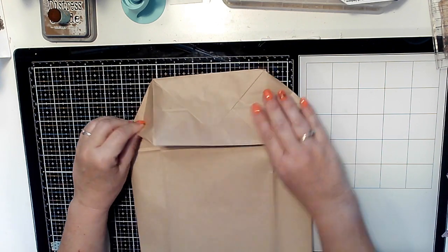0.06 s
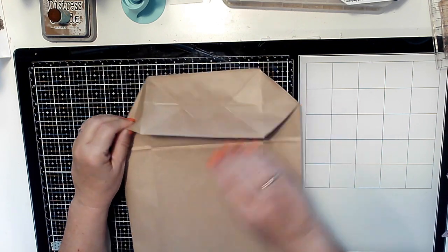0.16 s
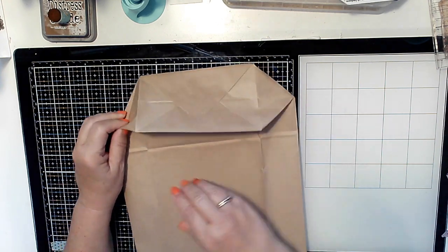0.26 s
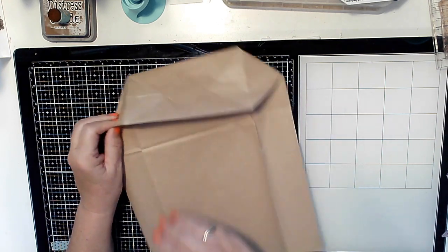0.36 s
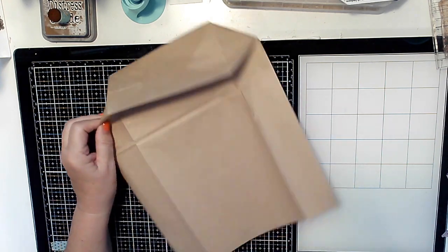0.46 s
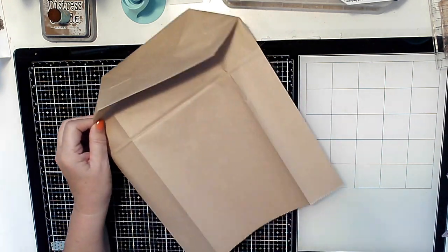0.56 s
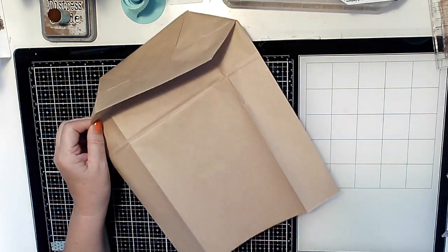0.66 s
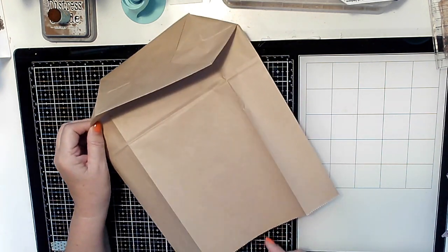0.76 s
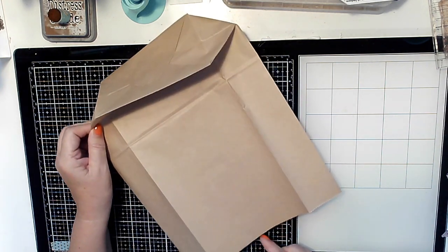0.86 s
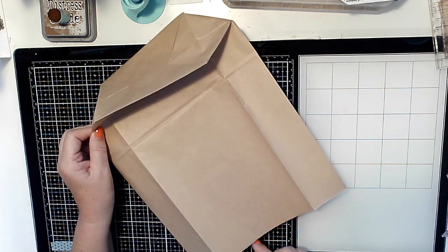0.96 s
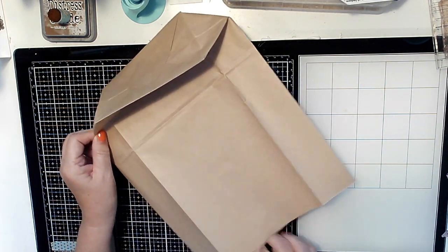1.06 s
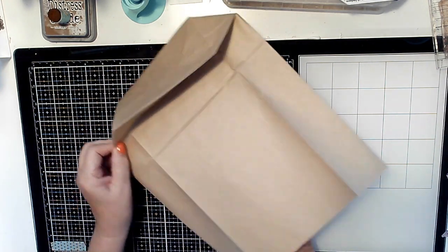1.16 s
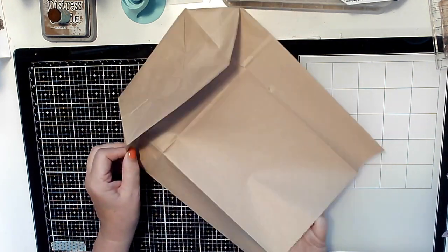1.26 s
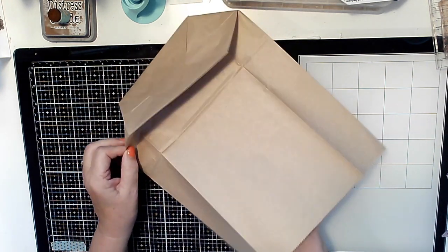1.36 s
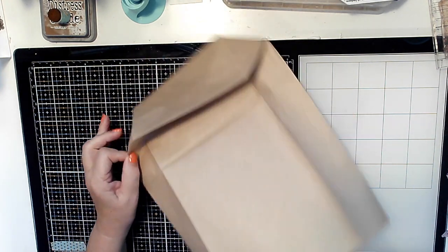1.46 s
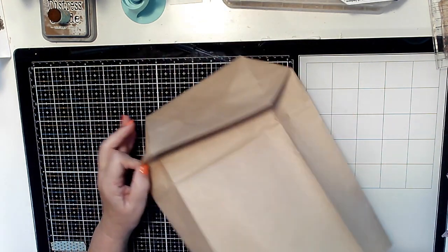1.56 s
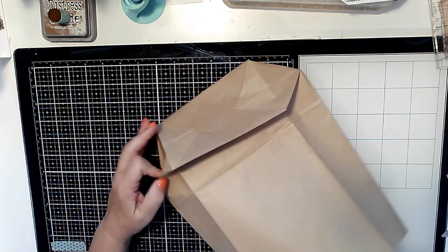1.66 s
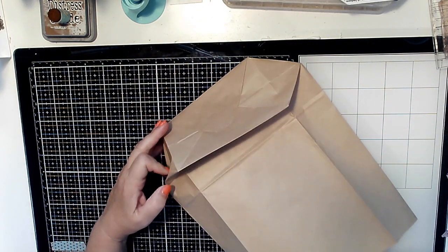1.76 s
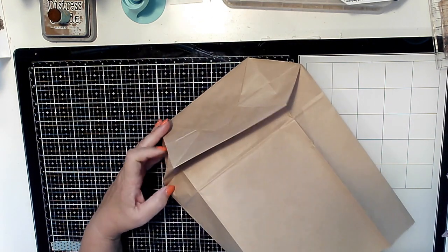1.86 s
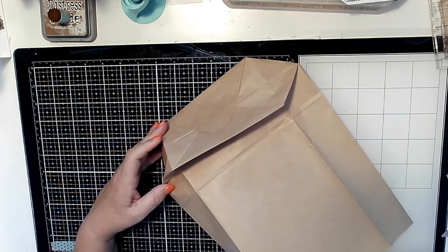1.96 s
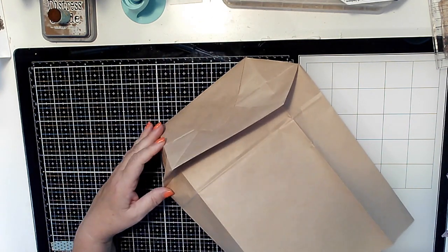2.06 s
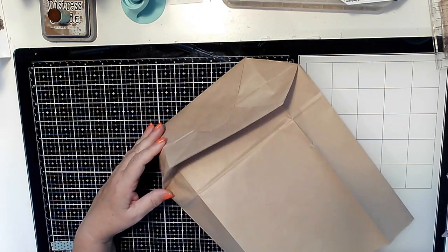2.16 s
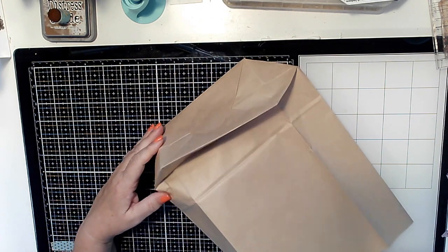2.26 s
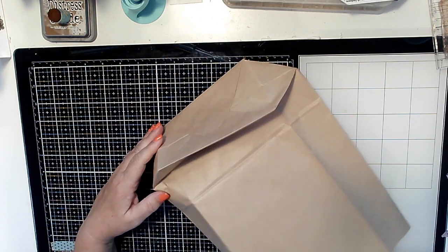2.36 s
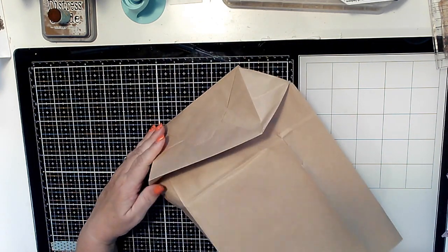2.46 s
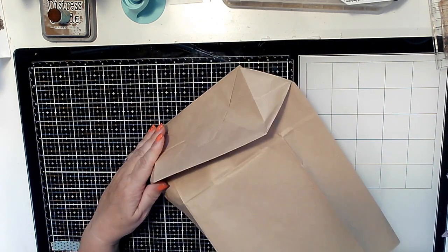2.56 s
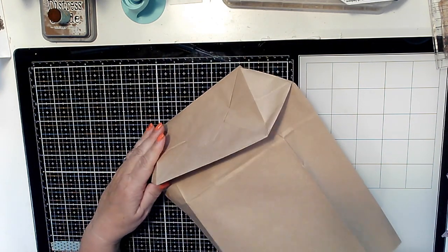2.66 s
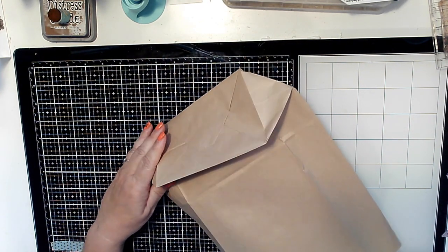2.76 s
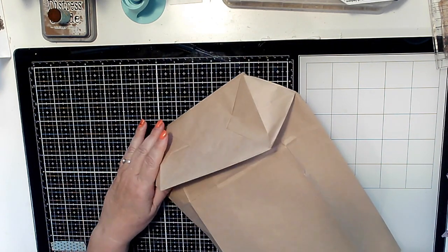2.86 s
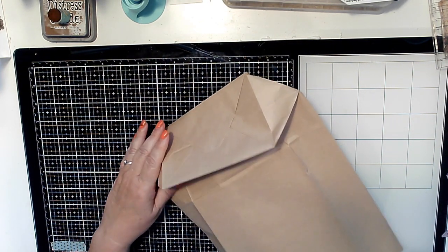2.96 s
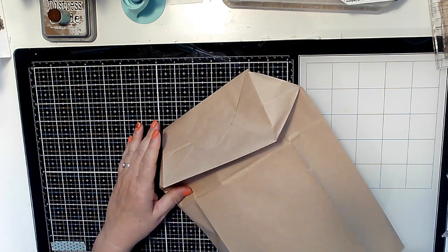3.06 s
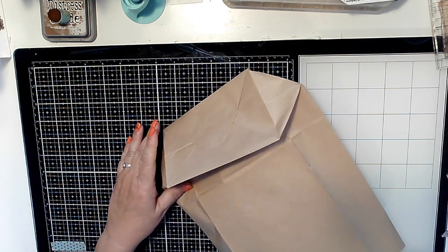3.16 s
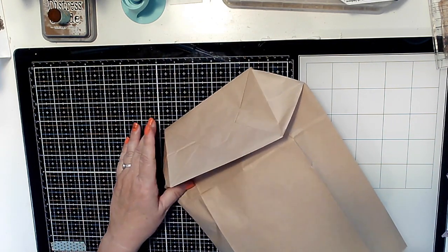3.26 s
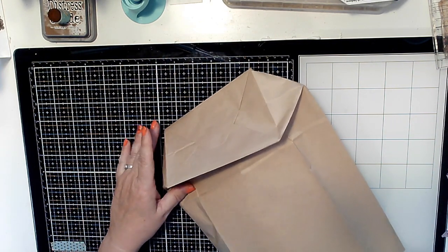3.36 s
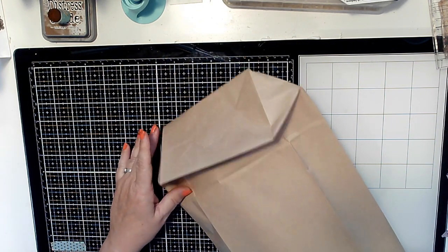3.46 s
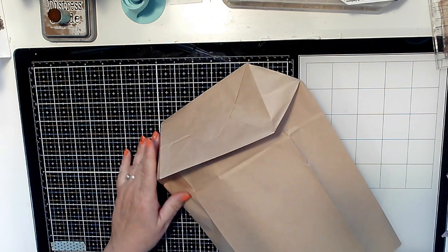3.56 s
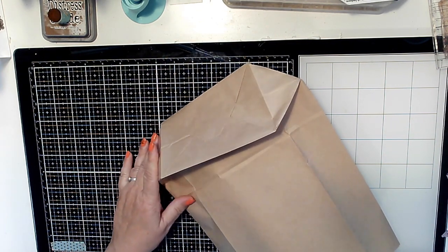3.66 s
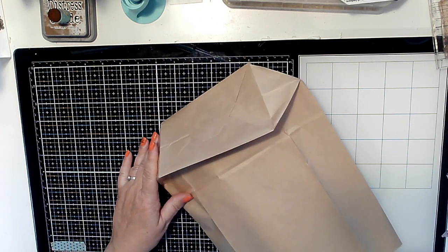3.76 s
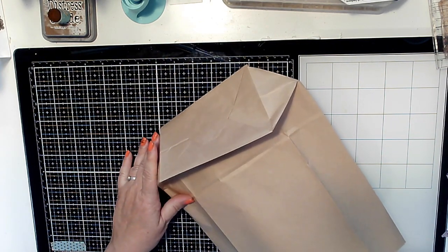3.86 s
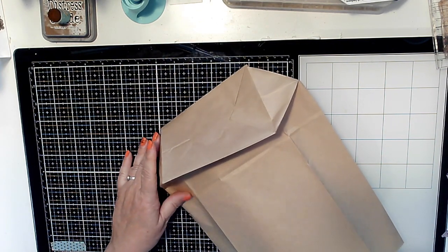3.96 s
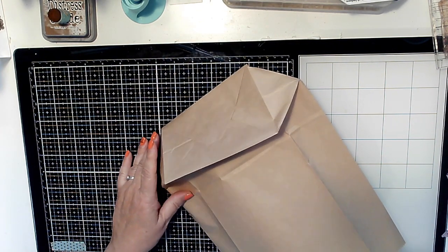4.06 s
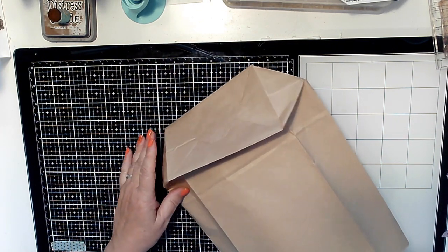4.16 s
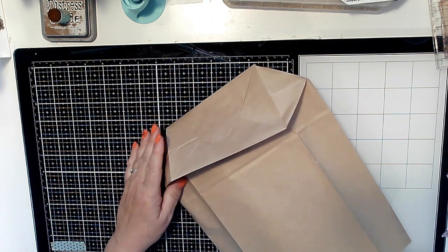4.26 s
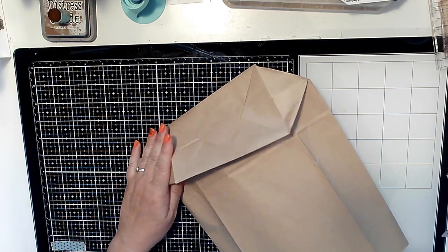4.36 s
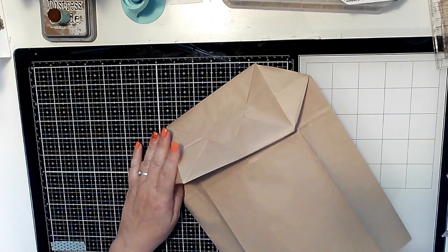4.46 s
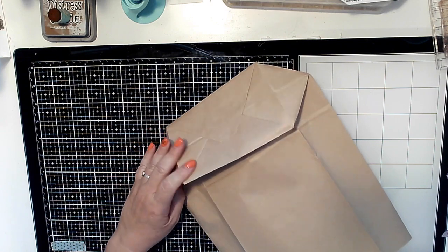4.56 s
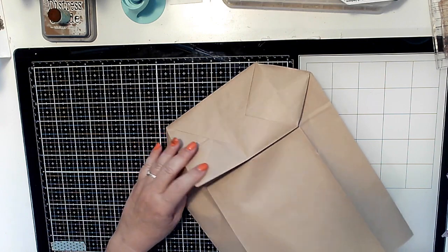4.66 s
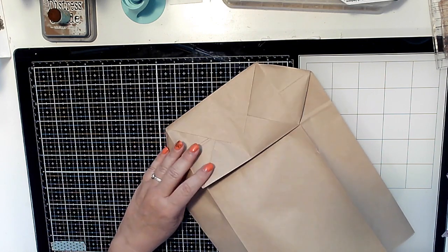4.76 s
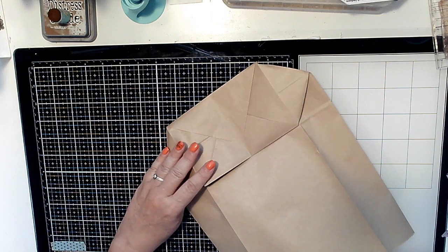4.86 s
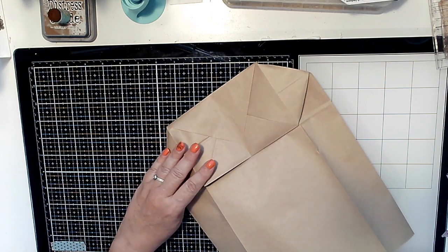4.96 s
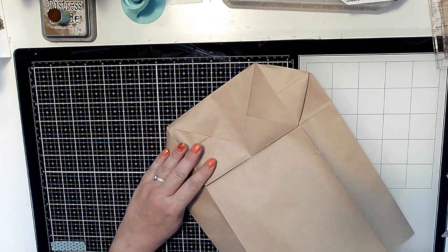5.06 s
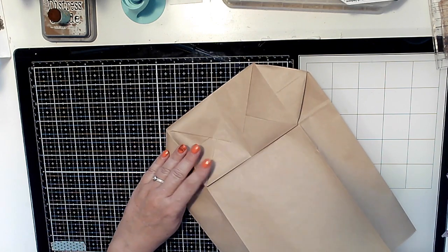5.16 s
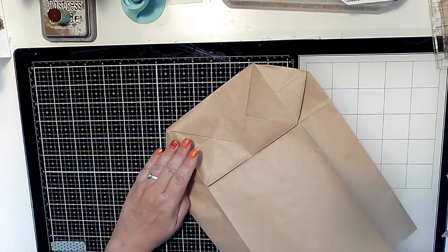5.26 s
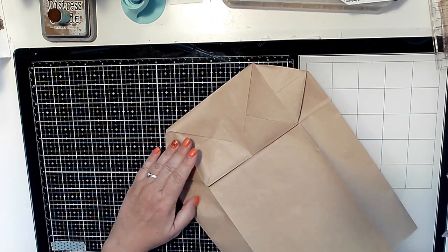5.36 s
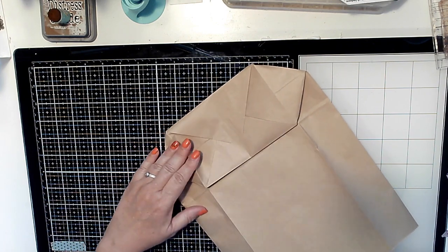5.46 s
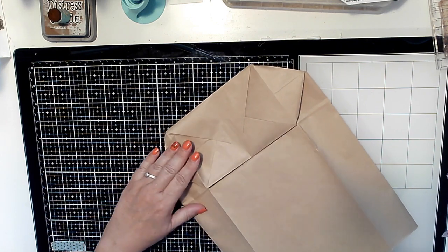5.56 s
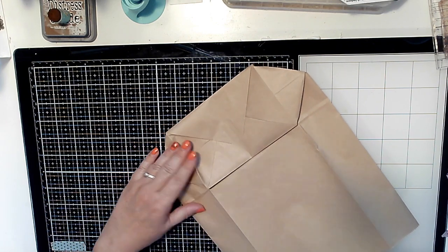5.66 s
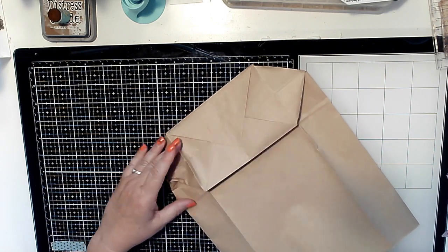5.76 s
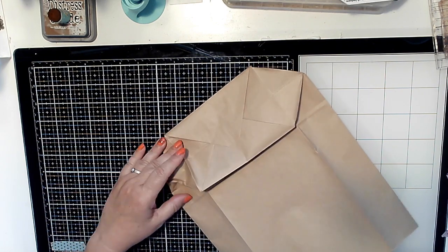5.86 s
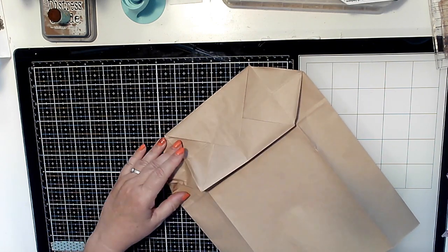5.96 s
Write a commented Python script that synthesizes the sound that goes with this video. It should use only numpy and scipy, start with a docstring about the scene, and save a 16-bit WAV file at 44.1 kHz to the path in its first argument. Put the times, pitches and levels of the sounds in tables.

```python
"""Creases of stiff paper crinkle in short bursts while wide panels pop and flap and the sheet slides on a mat.
Two hands turn a paper bag on a cutting mat and press its bottom flap along the creases. Crinkles and slides are
filtered trains of tiny stick-slip impulses; panels are pushes filtered around a pitch. Modes of the room and
table add resonances, a small, fairly dry room answers, and a microphone chain shapes the result."""
import sys
import numpy as np
from scipy import signal
from scipy.fft import rfft, irfft, next_fast_len
from scipy.io import wavfile
from scipy.ndimage import uniform_filter1d, map_coordinates

SR = 44100
rng = np.random.default_rng(int(sys.argv[2]) if len(sys.argv) > 2 else 0)


def bounce(signal):
    """Save signal as a 16-bit WAV file at the path given by the first command-line argument."""
    frames = np.transpose(np.atleast_2d(signal))
    limited = np.clip(frames, -1, 1)
    pcm = np.round(limited * 32767).astype(np.int16)
    wavfile.write(sys.argv[1], SR, pcm)


N = 265041
LEAD_S = .02  # strokes and pops are computed from this long before their nominal start


def amp(db):
    """Decibels to gain."""
    return 10 ** (np.asarray(db) / 20)


def unit(x):
    """Scale to rms 1."""
    return x / np.sqrt(np.mean(x ** 2) + 1e-20)


def along(points, hz):
    """Interpolate (Hz, value) points on a log frequency axis."""
    point_hz, values = np.transpose(points)
    return np.interp(np.log(hz + 1), np.log(point_hz), values)


def coloured(x, level_db, size=2048):
    """Minimum-phase filter with the gain level_db(Hz): it rings only after each impulse."""
    log_gain = np.log(amp(level_db(np.fft.rfftfreq(size, 1 / SR))) + 1e-6)
    cepstrum = irfft(log_gain)
    # Fold the cepstrum onto positive time.
    cepstrum[1:size // 2] *= 2
    cepstrum[size // 2 + 1:] = 0
    impulse_response = irfft(np.exp(rfft(cepstrum)))
    return signal.fftconvolve(x, impulse_response)


def filtered(x, response):
    """Apply a response of frequency to the whole track by FFT."""
    size = next_fast_len(N + SR // 2)
    return irfft(rfft(x, size) * response(np.fft.rfftfreq(size, 1 / SR)), size)[..., :N]


def add(track, start_s, x):
    """Mix x into the track at start_s."""
    rest = track[max(round(start_s * SR), 0):]
    rest[:len(x)] += x[:len(rest)]


def slips(count, per_second, spread_db):
    """Tiny stick-slip impulses of uneven size and random sign at random moments, rms 1."""
    happens = rng.random(count) < per_second / SR
    sizes = amp(spread_db * rng.standard_normal(count))
    return unit(happens * rng.choice([-1, 1], count) * sizes)


def stroke(length_s, rise, release_s):
    """Pressure that swells over a share of its length, holds and lets go; LEAD_S comes before its start."""
    t = np.arange(int((LEAD_S + length_s + 6 * release_s) * SR)) / SR - LEAD_S
    swell = (1 + np.tanh(t / (rise * length_s) - .5)) / 2
    return swell * np.exp(-np.maximum(t - length_s, 0) / release_s)


def facet_colour(depth_db, count=24):
    """Random (Hz, dB) points of mean power 1: every facet of the paper rings at its own pitches."""
    db = depth_db * rng.uniform(-0.72, 1, count)
    mean_power_db = 10 * np.log10(np.mean(amp(db) ** 2))
    return np.transpose([np.geomspace(500, 16000, count), db - mean_power_db])


def crinkle(length_s, db, slack, facets=4):
    """Fibres give way in a rush, in several facets by turns; slack paper adds body, a tight crease adds air."""
    # Paper spectrum. Each row: frequency in Hz, level in dB.
    paper_spectrum = [(40, -3.5), (100, 0), (160, 14), (750, 11), (1150, 7.5), (1700, 13), (2700, 4.5),
                      (3900, 9), (6000, 6), (8000, 1.5), (10500, 9), (15500, 0.5)]
    body_db = np.interp(slack, [0, 1], [-16.5, 10.9])
    rasp_db = np.interp(slack, [0, 1], [-13, 7])
    air_db = np.interp(slack, [0, 1], [0.91, -40.5])
    bass_db = body_db + 0.52 * (db + body_db + 39.0)  # only hard bends move the whole bag
    tone = [(170, bass_db), (500, body_db), (1250, rasp_db), (2100, rasp_db),
            (3400, 0.00068), (6500, 0), (10500, air_db)]

    # Slack paper gives way at once, but in jerks.
    pressure = stroke(length_s, rise=.02 + 0.23 * (1 - slack) ** 2, release_s=0.0052)
    t = np.arange(len(pressure)) / SR
    knots = t * 150  # jerks per second
    jerks = np.tanh(map_coordinates(rng.standard_normal(int(knots[-1]) + 4), [knots]))
    pressure = pressure * amp(5 * slack * jerks)
    grains = pressure * slips(len(pressure), per_second=7000, spread_db=4.5)

    # A random facet takes over every 3 ms.
    turn = rng.integers(facets, size=len(pressure))[(t / .003).astype(int)]
    burst = 0
    for k in range(facets):
        facet = facet_colour(depth_db=10.0)
        level_db = lambda hz: along(paper_spectrum, hz) + along(tone, hz) + along(facet, hz)
        burst = burst + coloured(grains * (turn == k), level_db)
    return amp(db) * in_room(burst, wet_db=-7.0)


def crinkles(rows):
    """Every bend of a crease at its moment."""
    out = np.zeros(N)
    for start_s, length_s, db, slack in rows:
        add(out, start_s - LEAD_S, crinkle(length_s, db, slack))
    return out


def strays(scrape_db, per_second=24, length_s=.002, offset_db=-4.5, spread_db=4.5, slack=.48):
    """Rows of small crinkles at random moments, whose level follows the scrape of the dragged sheet."""
    rows = []
    for when, size in rng.random((int(per_second * N / SR), 2)):
        db = scrape_db[int(when * N)] + offset_db + spread_db * (2 * size - 1)
        rows.append((when * N / SR, length_s, db, slack))
    return rows


def panel(push, centre_hz, skirt_db):
    """A panel answers around its own pitch, through the bag's body; it has the energy of 10 ms at rms 1."""
    # Body spectrum of a panel. Each row: frequency in Hz, level in dB.
    panel_spectrum = [(40, 9), (110, 4), (170, 3.5), (480, -2.5), (740, 0), (1080, -8), (1550, 2),
                      (2200, -16), (2800, -28), (4000, 8.5), (9000, -17.5)]

    def level_db(hz):
        octaves = np.log2((hz + 1) / centre_hz)
        return along(panel_spectrum, hz) - skirt_db * (np.hypot(1, octaves) - 1)

    x = coloured(push, level_db)
    return x / np.linalg.norm(x) * np.sqrt(SR / 100)


def pops(swell_s=0.00087, flutter_cycles=7.1):
    """A buckling panel starts to give, sends one push of air, then flutters; low panels flutter longer."""
    # Panels snapping through. Each row: moment in seconds, level in dB, centre in Hz.
    pop_rows = [(0.5, -51, 2000), (2.003, -36.5, 573), (2.186, -32.5, 484), (2.833, -35, 860),
                (3.254, -37.5, 385), (3.458, -33.5, 395), (3.6953, -34, 700), (3.753, -38, 477),
                (4.208, -57, 380), (4.384, -36.5, 620), (4.555, -38.5, 327), (4.9496, -38, 980),
                (5.3153, -41, 920), (5.872, -53, 540)]
    out = np.zeros(N)
    t = np.arange(SR // 10) / SR - LEAD_S
    for start_s, db, centre_hz in pop_rows:
        flutter_s = flutter_cycles / centre_hz
        envelope = np.exp(np.minimum(t / swell_s, -t / flutter_s))
        push = 0.096 * rng.standard_normal(len(t)) * envelope
        push[round(LEAD_S * SR)] += 1
        pop = in_room(panel(push, centre_hz, skirt_db=15.5), wet_db=-13.5)
        add(out, start_s - LEAD_S, amp(db) * pop)
    return out


def flaps():
    """A panel that flexes softly or pats the mat rumbles in a string of soft pushes."""
    # Soft flexes and pats. Each row: start in seconds, length in seconds, level in dB, centre in Hz.
    flap_rows = [(.033, 0.0065, -44, 511), (0.391, 0.036, -64.5, 550), (0.543, 0.018, -47.5, 234),
                 (0.74, .03, -82.5, 500), (0.896, 0.03, -75, 404), (1.43, 0.095, -38.5, 159),
                 (1.602, 0.097, -40, 344), (2.252, 0.031, -36.5, 497), (2.379, 0.0061, -49.5, 473),
                 (2.442, 0.021, -42.5, 343), (2.511, 0.011, -40.5, 180), (2.86, 0.024, -45, 700),
                 (3.273, 0.039, -38.5, 324), (3.577, 0.031, -38, 393), (3.796, 0.012, -41, 456),
                 (4.429, .022, -44, 533), (5.88, 0.023, -50, 232)]
    out = np.zeros(N)
    for start_s, length_s, db, centre_hz in flap_rows:
        pressure = stroke(length_s, rise=0.21, release_s=0.0031)
        push = pressure * slips(len(pressure), per_second=900, spread_db=3)
        flap = in_room(panel(push, centre_hz, skirt_db=25), wet_db=-6)
        add(out, start_s - LEAD_S, amp(db) * flap)
    return out


def drag_levels(attack_s=.017, sag_db_per_s=14, release_db_per_s=257):
    """Scrape and hiss in dB over time: the bag's turn plus rubs that bite, slow a little, then lift off."""
    # The bag swings round on the mat. Each row: time in seconds, scrape level in dB, hiss level in dB.
    turn_rows = [(1.109, -100, -84), (1.171, -73, -59.5), (1.22, -55, -47), (1.36, -45, -41.5),
                 (1.45, -37, -53.5), (1.62, -41.5, -51), (1.73, -46.5, -53), (1.83, -78, -66.5),
                 (1.9, -64, -60)]
    # A hand rubs along the paper. Each row: start in seconds, length in seconds, hiss level in dB,
    # weight (scrape over hiss) in dB.
    rub_rows = [(0, 0.31, -72.5, -1.5), (0.351, 0.29, -81.5, 3.5), (1.872, 0.28, -72, 6),
                (2.134, 0.23, -61.5, 2), (2.282, 0.074, -38.5, -4), (2.433, 0.35, -61.5, 9),
                (2.78, 0.17, -72.5, 6), (3.025, 0.2, -60, -6), (3.355, 0.29, -56.5, -5),
                (3.719, 0.21, -61, 9.5), (4.005, 0.052, -44.5, -2), (4.172, 0.18, -79, 3.5),
                (4.43, .2, -51.5, -4), (5.128, 0.35, -54, -12), (5.485, 0.11, -62.5, -27),
                (5.663, 0.14, -60.5, -10.5), (5.831, 0.14, -77.5, -2.5)]
    t = np.arange(N) / SR
    turn_s, *turn_db = np.transpose(turn_rows)
    gains = amp([np.interp(t, turn_s, db, left=-120, right=-120) for db in turn_db])
    for start_s, length_s, hiss_db, weight_db in rub_rows:
        age_s = t - start_s
        sag_db = sag_db_per_s * np.maximum(age_s, 0)
        release_db = release_db_per_s * np.maximum(age_s - length_s, 0)
        attack = (1 + np.tanh(age_s / attack_s - 1)) / 2
        rub = attack * amp(hiss_db - sag_db - release_db)
        gains = np.hypot(gains, [rub * amp(weight_db), rub])
    return 20 * np.log10(gains)


def patchy(x, depth_db):
    """The colour shifts from moment to moment as other parts of the sheet touch."""
    z = signal.stft(x, nperseg=512)[2]
    field = uniform_filter1d(rng.standard_normal(z.shape), size=7, axis=0)
    field = uniform_filter1d(field, size=4, axis=1)
    return unit(signal.istft(z * amp(depth_db * unit(field)), nperseg=512)[1][:N])


def sliding(scrape_db, hiss_db):
    """Paper drags unevenly: a grainy scrape from the sheet, a fine hiss from its surface, air from fingertips."""
    # Spectra of sheet, surface and fingertips. Each row: frequency in Hz, level in dB.
    scrape_spectrum = [(30, -8.5), (100, -14), (165, -4.5), (700, -3), (1100, -17), (1700, -6), (2800, -20),
                       (6000, -36.5)]
    hiss_spectrum = [(800, -44), (2700, -8), (3800, 5), (6500, 4), (9000, -15), (15500, -11.5)]
    air_spectrum = [(6000, -34), (9800, -0.5), (15500, -0.5)]
    knots = np.arange(N) / SR * 45  # grip changes per second
    grip_db = 2.2 * map_coordinates(rng.standard_normal(int(knots[-1]) + 4), [knots])

    scrape = coloured(slips(N, per_second=1600, spread_db=2), lambda hz: along(scrape_spectrum, hz))
    hiss = coloured(slips(N, per_second=5400, spread_db=1), lambda hz: along(hiss_spectrum, hz))
    air = coloured(rng.standard_normal(N), lambda hz: along(air_spectrum, hz))
    air_db = hiss_db + np.minimum(0.24 * (hiss_db - scrape_db) - 2, 2)  # a light touch is brightest

    drag = patchy(scrape, depth_db=6.0) * amp(scrape_db + grip_db)
    drag += patchy(hiss, depth_db=2) * amp(hiss_db + grip_db / 2)
    drag += patchy(air, depth_db=2.5) * amp(air_db + grip_db)
    return amp(-2) * in_room(drag, wet_db=-15.5)[:N]


def room_modes(paper):
    """Modes of the room and the table boost a few resonances."""
    # Room and table modes. Each row: frequency in Hz, width in Hz, boost in dB.
    resonances = [(160, 31, 2.5), (353.6, 17, 5), (540, 68, 3), (736.6, 23, 6.5), (878.5, 21, 5.5)]

    def response(hz):
        total = 1
        for centre_hz, width_hz, boost_db in resonances:
            damping = 1j * hz * width_hz
            total = total + (amp(boost_db) - 1) * damping / (centre_hz ** 2 - hz ** 2 + damping)
        return total

    return filtered(paper, response)


def in_room(x, wet_db, echo=0.15, echo_delay_s=.0078):
    """Direct sound, one near reflection whose delay varies from call to call, and a short diffuse tail."""
    # Room decay. Each row: frequency in Hz, t60 in seconds.
    decay = [(150, 0.11), (1000, 0.14), (4000, 0.15), (15000, 0.13)]
    hz, t, z = signal.stft(rng.standard_normal(SR // 3), SR, nperseg=256)
    tail = signal.istft(z * amp(-60 * t / along(decay, hz)[:, None]), SR, nperseg=256)[1]
    tail *= 1 - np.exp(-np.arange(len(tail)) / SR / 0.02)  # gradual build-up
    answer = amp(wet_db) * tail / np.linalg.norm(tail)
    answer[0] += 1
    wall = rng.standard_normal(SR // 500) * np.exp(-np.arange(SR // 500) / 20)
    delay = round(echo_delay_s * rng.uniform(.9, 1.1) * SR)
    answer[delay:][:len(wall)] += echo * wall / np.linalg.norm(wall)
    return signal.fftconvolve(x, answer)


def suppress(x, most_db=-20):
    """Noise suppressor: each band is turned down when its power sinks towards and under the threshold."""
    # Suppressor threshold. Each row: frequency in Hz, level in dB of an equally dense white noise.
    threshold = [(750, -82.5), (1150, -66.5), (1600, -80.5), (2100, -84.5), (2750, -54.5), (3400, -76.5),
                 (8100, -75.5), (8700, -28.5), (9300, -81)]
    hz, _, z = signal.stft(x, SR, nperseg=512)
    power = np.abs(uniform_filter1d(np.abs(z) ** 2, size=3, axis=1)) * 512 / 1.5  # 1.5: window bandwidth
    gain = power / (power + amp(along(threshold, hz))[:, None] ** 2)
    return signal.istft(z * np.maximum(gain, amp(most_db)), SR, nperseg=512)[1][:, :N]


def scene():
    """All the sounds of the paper, coloured by the modes of the room and table."""
    # Bends of a crease. Each row: start in seconds, length in seconds, level in dB,
    # slack from 0 (taut and airy) to 1 (loose and hollow).
    crinkle_rows = [(.119, 0.011, -40, 0.36), (.147, 0.053, -55, 0.84), (.246, 0.023, -45.5, 0.55),
                    (.498, 0.014, -57, 0.54), (.596, 0.0096, -46, 0.27), (1.128, 0.022, -52.5, 0),
                    (1.259, 0.045, -36, 0.5), (1.311, 0.05, -32.5, 0.49), (1.412, 0.029, -40.5, .6),
                    (1.46, 0.038, -39.5, .53), (1.672, 0.0097, -36, 0.23), (1.858, 0.0086, -51.5, 0.66),
                    (1.879, 0.021, -45, 0.64), (1.937, 0.026, -49, 0.86), (2.003, 0.01, -37, 0.4),
                    (2.116, .015, -52, 0.44), (2.264, 0.049, -35, 0.26), (2.296, 0.037, -35.5, 0.073),
                    (2.515, .016, -39, 0.6), (2.565, 0.032, -42, 0.64), (2.646, 0.0084, -35.5, 0.32),
                    (2.662, .024, -32.5, 0.33), (2.832, 0.013, -51.5, .72), (2.86, 0.036, -49.5, 0.8),
                    (3.031, 0.0085, -58.5, 0.75), (3.067, 0.012, -38.5, 0.31), (3.125, 0.05, -38.5, 0.29),
                    (3.243, 0.023, -47, 0.87), (3.372, 0.006, -50, 0.59), (3.422, 0.046, -42, 0.62),
                    (3.529, 0.012, -50.5, 0.57), (3.693, 0.012, -39, 0.28), (3.832, 0.038, -45.5, 0.44),
                    (3.884, 0.014, -39, 0.49), (4.004, 0.02, -37.5, 0.43), (4.044, 0.034, -35.5, 0.15),
                    (4.445, 0.038, -39, 0.21), (4.562, 0.02, -38, 0.57), (4.735, 0.046, -41.5, 0.68),
                    (4.885, .045, -39.5, 0.58), (4.949, 0.0061, -41, 0.56), (5.163, .024, -41.5, 0.31),
                    (5.365, 0.017, -46, 0.4), (5.507, 0.017, -43.5, 0.039), (5.647, 0.014, -42, 0.26),
                    (5.871, 0.017, -64.5, 0.49)]
    scrape_db, hiss_db = drag_levels()
    paper = crinkles(crinkle_rows) + pops() + flaps()
    paper += sliding(scrape_db, hiss_db) + crinkles(strays(scrape_db))
    return room_modes(paper)[None]


def record(dry, notch_hz=8700, notch_width_hz=300, notch_db=9, bass_cut_hz=44, top_hz=15850):
    """The microphone thins the deep bass, dips in the treble, suppresses faint noise and has a hard band limit."""
    def microphone(hz):
        dip = amp(-notch_db / (1 + ((hz - notch_hz) / notch_width_hz) ** 2))
        return dip * (1j * hz / (1j * hz + bass_cut_hz)) ** 2

    heard = suppress(filtered(dry, microphone))
    return filtered(heard, lambda hz: (1 - np.tanh((hz - top_hz) / 40)) / 2)


dry = scene()
out = record(dry)
bounce(out)
```